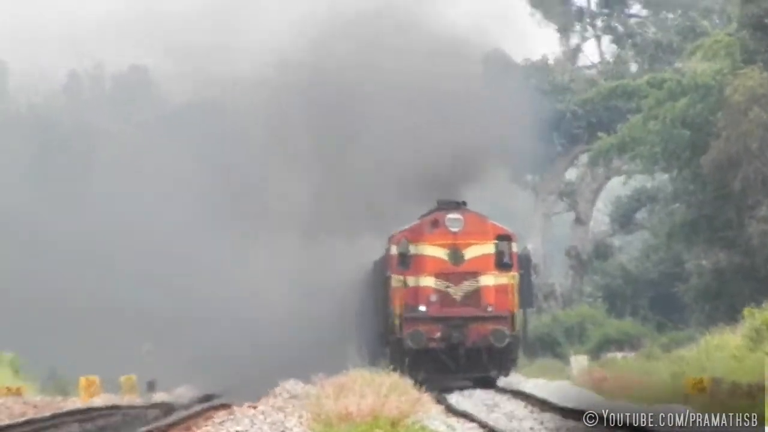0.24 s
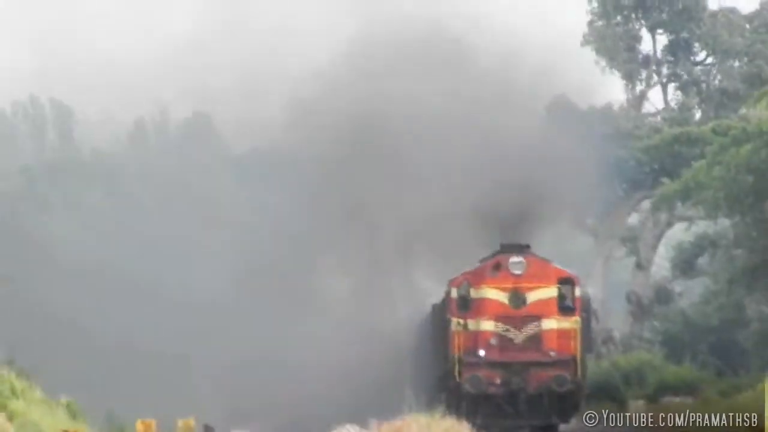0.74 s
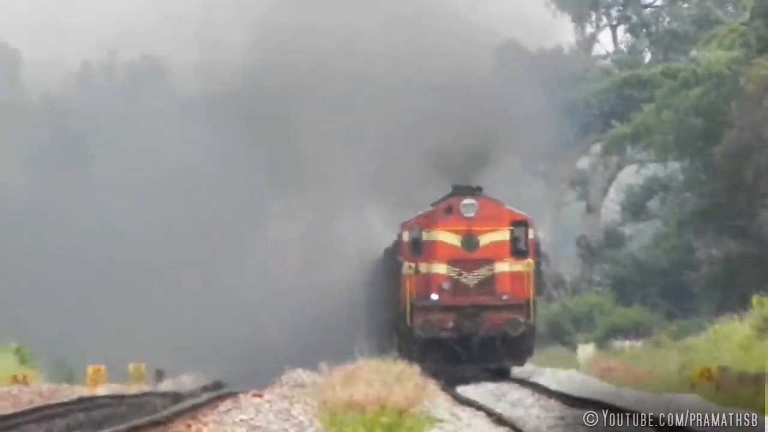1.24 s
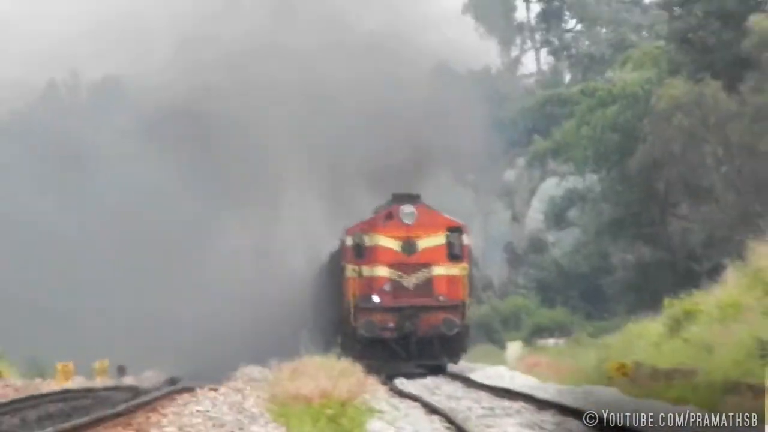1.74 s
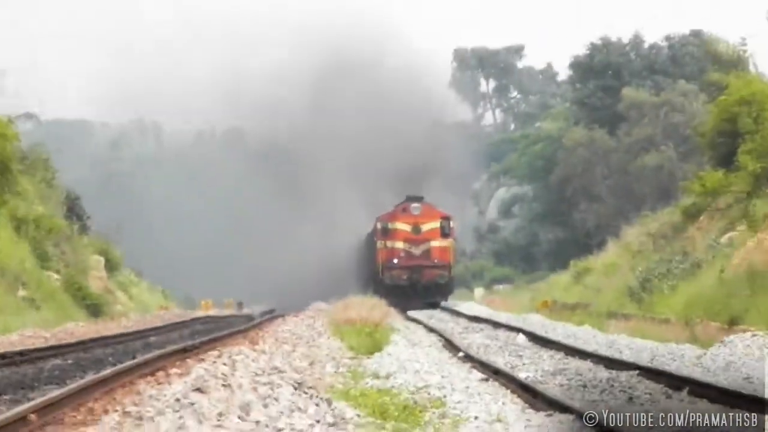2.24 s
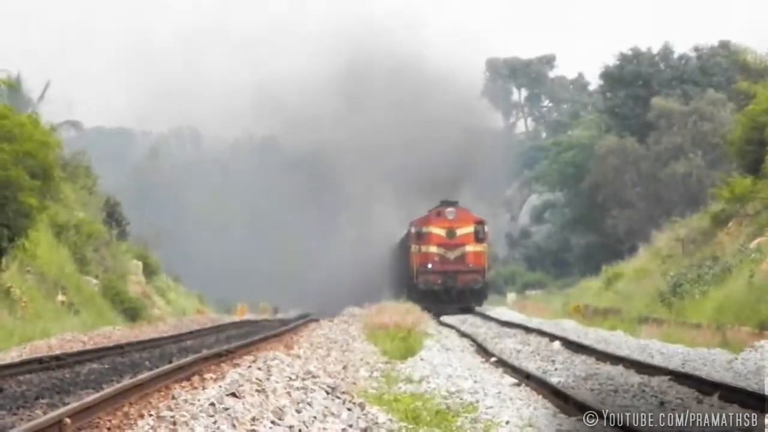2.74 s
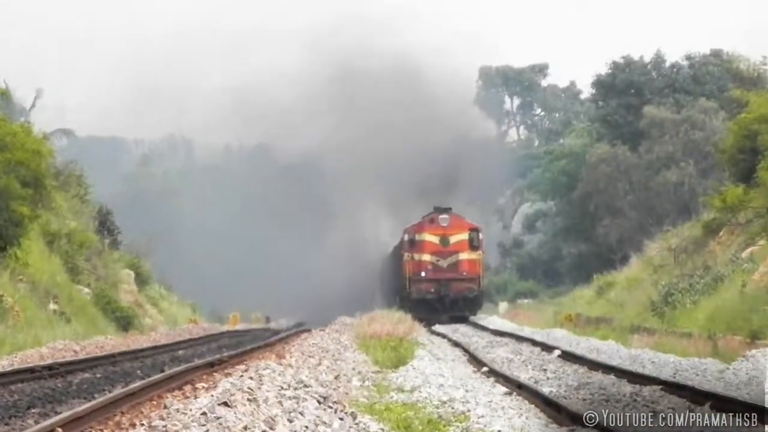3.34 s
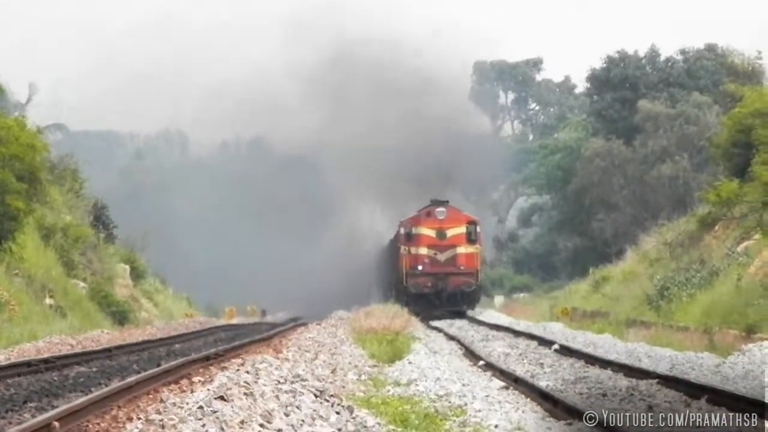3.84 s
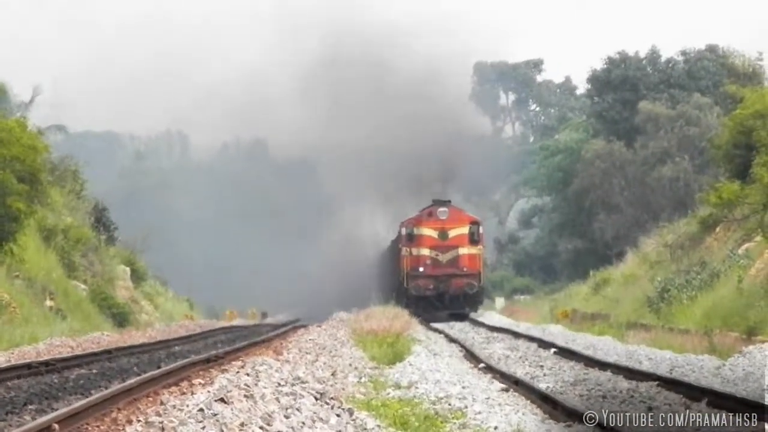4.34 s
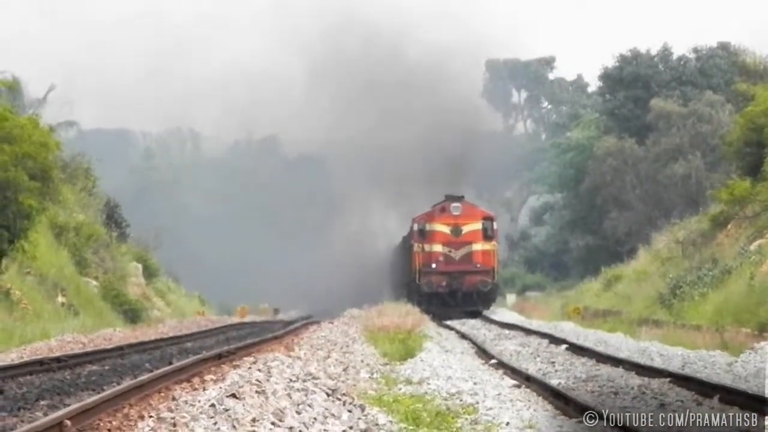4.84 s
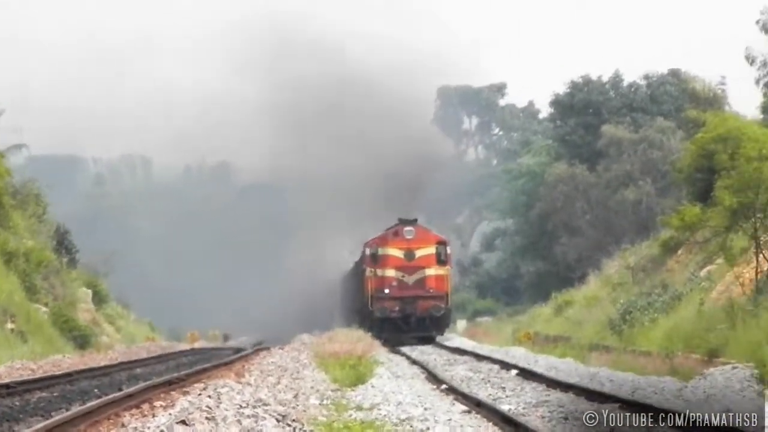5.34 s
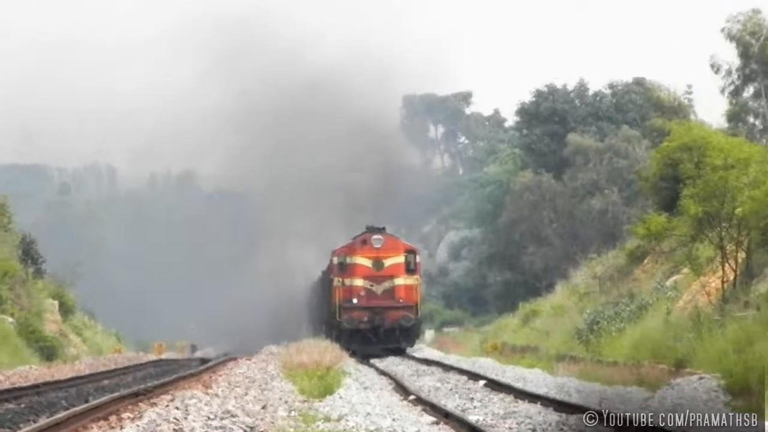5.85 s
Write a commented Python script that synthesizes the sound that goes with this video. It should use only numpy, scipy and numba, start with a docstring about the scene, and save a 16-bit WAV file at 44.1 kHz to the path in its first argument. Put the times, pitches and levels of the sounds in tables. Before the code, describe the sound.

Distant heavy diesel engines throb and chuff steadily under hard labor, while wind buffets the microphone and camera handling clicks, knocks and whirrs close by.

```python
"""Distant diesels past a hand-held camera

Two heavy diesel engines pull far off in a grassy cutting: summed orders of the engine cycle thump once
a cycle under a shaped-noise roar that chuffs in step. Noise gusts and single swings buffet the microphone
ports; the camera's plastic case rings to knocks, its focus motor thuds and whines in steps, and its zoom
motor whirrs, rasps and ticks."""
import sys
import numpy as np
from scipy import signal
from scipy.fft import rfft, irfft
from scipy.io import wavfile
from scipy.ndimage import uniform_filter1d
from numba import njit

SR = 44100
rng = np.random.default_rng(int(sys.argv[2]) if len(sys.argv) > 2 else 0)


def inscribe(sig):
    """Save sig as 16-bit PCM at rate SR to the path in sys.argv[1].

    A 1-D sig is mono; a 2-D sig holds one channel per row.
    Samples are clipped to [-1, 1] before scaling.
    """
    pcm = np.round(np.clip(np.atleast_2d(sig).T, -1, 1) * 32767)
    wavfile.write(sys.argv[1], SR, pcm.astype(np.int16))


N = 269010
T = np.arange(N) / SR

# Levels are relative settings; the functions add their own gains, and resonances a gain for their width.

# spectrum of the soft breeze: f/Hz, level/dB
BREEZE_SPECTRUM = [(12, -30), (28, -19), (40, -11), (60, -1), (100, -12.5), (140, -40), (300, -62),
                   (1500, -120)]
# strength of the breeze: t/s, level/dB
BREEZE_LEVEL = [(0, -40), (1.3, -35.5), (2, -42), (2.9, -44), (4.3, -51), (4.6, -41), (5.7, -41),
                (6.1, -58)]
# spectrum of the gusts: f/Hz, level/dB
GUST_SPECTRUM = [(15, -40), (28, -22), (40, -1.5), (70, 0.5), (120, 1.5), (170, -9), (250, -22.5),
                 (400, -64), (800, -85), (3000, -120)]
# gusts: peak t/s, peak level/dB, swell and fade time/s, left minus right level/dB
GUSTS = [(.52, -44.5, 0.019, 15), (.68, -35, 0.011, 2), (.8, -51, 0.018, -11), (1.288, -25, 0.034, -6.5),
         (1.44, -38, 0.097, -14), (1.69, -34.5, 0.021, -13), (1.77, -23, 0.032, -1.5),
         (1.827, -18.5, 0.008, 0), (1.952, -24, 0.014, 3), (2.03, -21.5, 0.026, 8), (2.141, -20, 0.05, 5),
         (2.228, -27, 0.02, -14), (2.33, -27.5, 0.021, 0), (2.44, -34.5, 0.04, -4), (2.56, -35, 0.048, 0),
         (3.99, -41, 0.042, -1), (4.64, -44.5, 0.081, -3), (5.76, -27, 0.043, 2), (5.81, -46, 0.016, -19),
         (5.931, -29, 0.015, 2), (6.07, -43, 0.042, -6)]
LULL_DB = -57  # gust level between the peaks
# single gust pops: t/s, f/Hz, left swing, right swing
GUST_POPS = [(0.668, 149, 0.13, -0.024), (0.879, 74, 0.0013, 0.1), (1.278, 138, -0.11, 0.15),
             (1.328, 96, -0.05, 0.28), (1.827, 133, 0.22, -0.94), (1.962, 87, 0.27, 0.24),
             (2.013, 91, 0.29, 0.026), (2.043, 99, 0.29, -0.37), (2.086, 133, -0.15, 0.51),
             (2.143, 119, -0.27, -0.1), (2.189, 138, 0.6, -0.14), (2.228, 124, 0.25, 0.1),
             (2.448, 98, -0.067, 0.32), (2.555, 93.5, -0.096, 0.27), (5.782, 91.5, 0.32, 0.049),
             (5.917, 150, -0.024, 0.016)]

# steps of the focus motor, in runs of about ten a second: t/s, thud level/dB, whine level/dB, whine length/s
FOCUS_STEPS = [(0.814, -33.5, -32.5, 0.017), (0.911, -34.5, -44, 0.039), (1.011, -38.5, -39, 0.024),
               (1.11, -33.5, -47.5, 0.038), (1.206, -33, -51, 0.027), (1.315, -32.5, -63, 0.023),
               (1.417, -37.5, -70, 0.027), (2.984, -37.5, -66, 0.024), (3.076, -38, -59.5, 0.038),
               (3.175, -40, -58, 0.023), (3.277, -44, -61, 0.03), (3.38, -40.5, -53, 0.03),
               (3.482, -37.5, -52, 0.027), (3.579, -35, -70, 0.03), (4.315, -45, -59, 0.036),
               (4.739, -39, -70, 0.03), (4.906, -50, -66, 0.022), (5, -43, -73, 0.027),
               (5.108, -35, -62, 0.028), (5.209, -35, -48, 0.028), (5.312, -36.5, -60, 0.022),
               (5.411, -35.5, -50, 0.024), (5.507, -33, -51, 0.03), (5.618, -35, -60, 0.022),
               (5.713, -33.5, -55, 0.02), (5.809, -35, -51, 0.025), (5.91, -51, -64, 0.026),
               (6.006, -38, -56, 0.03)]
THUD_S = 0.017
# jerks of the zoom motor: t/s, whine level/dB, length/s
ZOOM_JERKS = [(1.856, -36, .007), (1.868, -35, 0.0084), (1.888, -33.5, 0.0061), (1.905, -43, 0.0054),
              (1.934, -37, 0.02), (1.958, -46, 0.0078), (1.975, -50, 0.027), (2.008, -48, 0.011),
              (2.046, -44, 0.014), (2.062, -40, 0.0088), (2.076, -40, .006), (2.094, -40, 0.02),
              (2.125, -41.5, 0.023), (2.182, -38, 0.01), (2.218, -48, 0.012), (2.264, -44, 0.0059),
              (2.305, -45, 0.041), (2.455, -49, 0.019)]
# whine resonances of the motors: f/Hz, width/Hz, level/dB
MOTOR_WHINE = [(3810, 480, 20), (4340, 73, 9), (1460, 540, 10), (2950, 130, 8.5)]
# resonances of the lens barrel: f/Hz, width/Hz, level/dB
LENS_BARREL = [(344, 154, 4), (620, 260, 0), (1100, 133, -11.5), (1466, 91, -6.5), (1990, 45, -14),
               (2890, 310, -17)]

# zoom whirr resonances in the mid channel: f/Hz, width/Hz, level/dB
WHIRR_MID = [(346, 150, 12.5), (1010, 510, 9.5), (2720, 890, 9.5), (3620, 500, 8.5), (5260, 1300, 5.5),
             (9000, 2000, -14)]
# zoom whirr resonances in the side channel: f/Hz, width/Hz, level/dB
WHIRR_SIDE = [(2660, 500, 3), (3780, 600, 0), (5200, 330, 1), (6170, 840, -5)]
# resonances of the lens gear: f/Hz, width/Hz, level/dB
GEAR_RING = [(4970, 2000, 16.5), (8550, 1800, 8.5), (11400, 1100, 2), (13500, 2400, -2)]
# ticks of the lens gear, with a run as the zoom slows to its stop: t/s, peak level/dB
GEAR_TICKS = [(1.7908, -43), (1.8316, -33), (2.242, -46), (2.2617, -36), (2.277, -38), (2.291, -33),
              (2.31, -41), (2.329, -32), (2.35, -33), (2.369, -28), (2.39, -31), (2.409, -32),
              (2.4295, -43), (2.6462, -36), (2.6605, -31), (3.442, -40), (4.7794, -45), (4.8027, -40)]
ZOOM_ON_S, ZOOM_OFF_S, ZOOM_RISE_S, ZOOM_FALL_S, WHIRR_DB, RASP_DB = 1.82, 2.51, 0.052, 0.063, -57.5, -63
SLOWING_ON_S, SLOWING_OFF_S, SLOWING_RASP_DB = 2.25, 2.445, -53
CRACKLE_PER_S, CRACKLE_DB, CRACKLE_SPREAD_DB = 1500, 5.5, 2.5

# modes of the plastic case, low to high: f/Hz, width/Hz, level/dB
CASE_MODES = [(363.5, 58, 1), (518, 91, -2), (661, 86, -7.5), (812, 70, -3), (959, 72, -4.5),
              (1243, 150, -4), (1380, 100, -8.5), (1520, 125, -6.5), (1845, 250, -5), (2030, 160, -2),
              (2340, 220, -2.5), (2710, 320, -3), (3294, 340, -10)]
# resonances of the button rattle: f/Hz, width/Hz, level/dB
BUTTON_RATTLE = [(3921, 740, 3.5), (4531, 860, -2), (6331, 980, -7.5), (9201, 1500, -13),
                 (12901, 3300, -18)]
# knocks: t/s, low ring level/dB; middle, upper and hard ring level above the low one/dB;
# rattle level/dB, side minus mid level/dB, fall/s (bursts never fall quicker than 1 ms)
CASE_KNOCKS = [(0.7804, -23.5, -3, -16, -8.5, -42, 2, 0.0045),
               (1.1898, -22.5, 0.5, -8, -13.5, -41.5, 0, 0.0078),
               (1.4665, -21, 2, -2.5, -9.5, -37, 5, 0.0052), (1.473, -26, -2, -3, -27, -42, -7, 0.0042),
               (1.682, -32, 1, 2, -4, -46, -7, 0.0041), (1.755, -36.5, 1, -2, 3, -41, -4, 0.0091),
               (1.764, -38, -1, 12, -2, -33, -9, 0.0051), (1.768, -31.5, -8, -5, 3.5, -42, 1, 0.0027),
               (1.772, -36, 5, 3, -10, -38, 10, 0.0023), (1.782, -35, -2, -1, -1, -45, 0, 0.0059),
               (1.791, -23.5, 1.5, 8.5, -22, -31, -6, 0.0043),
               (1.832, -25, 1.5, -1, -8.5, -39, 6.5, 0.0056), (1.955, -30.5, 1.5, 1, -21, -34, 3, 0.0039),
               (2.1471, -32, 1, 2, 4, -28, 9.5, 0.0027), (2.152, -34, 8, -3, 3, -24, -9, 0.0018),
               (2.157, -43, -4, 6, 3, -33, 1, 0.0022), (2.162, -35.5, 14, 0, 4, -31, 2, 0.002),
               (2.165, -38.5, 3, 8, 6, -28, 5, .001), (2.1713, -33, 7, 2, -2, -22.5, 7, 0.00086),
               (2.59, -41, -8, -13, -22, -67, -4, 0.0034), (2.627, -43.5, 16, 10, -15, -50, -8, 0.0046),
               (2.63, -42, 18.5, 15, -11, -51, -5, 0.0029), (2.6454, -37, 4, 15, 8, -42, -9, 0.0036),
               (2.661, -41, 2, 10, -2, -36, -6, 0.002), (2.666, -29.5, 2, -3, -21, -41, -15, 0.0017),
               (2.67, -35, -7, 3, -9, -43.5, 2, 0.0063), (2.687, -30, -10, -3, -13, -47, -8, 0.0023),
               (2.694, -32.5, -14, -9, -27, -62, -6, 0.0018), (2.7, -31, -19, -28, -35, -68, -11, .002),
               (2.823, -40, -10, -14, -15, -63, -5, 0.003), (3.953, -37, -20, -17, -14, -65, -5, .004)]
SCUFF_DB = -3.5

# speed of the leading engine: t/s, four-stroke cycle rate f/Hz
LEAD_SPEED = [(0, 8.10), (1.2, 8.23), (6.1, 8.23)]
# start points in cycles, rear cycle rate in Hz, shared phase of the orders in turns
LEAD_START, REAR_HZ, REAR_START, ORDER_PHASE = .03, 8.29, -.07, .1
# orders of the leading engine: multiple of the cycle rate, level/dB
LEAD_ORDERS = [(4, -58), (5, -38.5), (6, -40), (7, -33), (8, -42.5), (9, -36), (10, -42.5), (11, -40),
               (12, -43.5), (13, -56.5), (14, -50), (15, -56), (18, -66), (21, -66), (22, -70), (23, -60.5),
               (25, -62), (26, -71.5)]
# orders of the rear engine: multiple of the cycle rate, level/dB
REAR_ORDERS = [(7, -40), (8, -57), (9, -46), (11, -48), (12, -52.5)]
# exhaust thump: t/s, gain level/dB
THUMP_GAIN = [(0, -5), (.7, -3), (1.4, -1.5), (2.1, -0.5), (2.8, 1.5), (3.4, -1), (4, 0), (4.7, -2),
              (5.4, 1.5), (6.1, -2.5)]
# roar: t/s, chest level/dB, bark level/dB, gas and air level/dB, level off the slopes/dB
ROAR_LEVELS = [(0, -49.5, -53, -53.5, -40), (1.1, -55, -53.5, -54.5, -39), (1.7, -55, -53, -54, -39.5),
               (1.95, -39, -52, -54, -38), (2.3, -50, -50.5, -56, -41.5),
               (2.75, -49.5, -48.5, -61.5, -45.5), (3.18, -49, -57.5, -60.5, -42.5),
               (3.4, -49.5, -55.5, -55, -41), (3.7, -51.5, -54, -54, -39.5), (4.2, -51.5, -52, -53, -39.5),
               (5.27, -47, -50, -52, -39.5), (6.1, -48, -47.5, -52, -39)]
RUMBLE_DB = -40
# spectrum of the roar ahead: f/Hz, level/dB
AHEAD_SPECTRUM = [(20, -43), (36, -14), (60, 0), (110, -10.5), (145, -20.5), (190, -18), (270, -25),
                  (370, -23), (870, -24), (3000, -34.5), (6000, -46), (15500, -64)]
# resonances that colour the roar: f/Hz, width/Hz, level/dB
STACK_RESONANCES = [(654, 102, -4.5), (1076, 330, -10), (1633, 340, -8), (2176, 390, -4.5),
                    (2590, 450, -13.5), (3835, 140, -16)]
# dips in the roar: f/Hz, width/Hz, depth 0-1
ROAR_DIPS = [(437, 97, 0.21), (847, 210, 0.45), (1390, 130, 0.26)]
# spectrum of the roar off the slopes: f/Hz, level/dB
SLOPE_SPECTRUM = [(12, -21), (20, 0), (80, -19), (126, -64), (157, -66), (232, -18), (315, -4.5),
                  (342, -0.5), (416, 3), (565, -2.5), (614, -3), (686, -4.5), (811, -5.5), (1410, -10),
                  (15500, -46.5)]
# the exhaust chuffs once a cycle; times in cycles
CHUFF_START, CHUFF_RISE, CHUFF_FALL, CHUFF_SCATTER, BARK_START, BARK_FALL = .45, 0.028, 0.45, 0.15, 1, 0.052
# notches from a hand near the ports: f/Hz, width/Hz
HAND_NOTCHES = [(450, 220), (1800, 670)]
HOLLOW_ON_S, HOLLOW_OFF_S, HOLLOW_FADE_S, HOLLOW_SHARE = 1.79, 3.56, 0.3, 0.74
# glide of those notches: t/s, factor on f
HAND_GLIDE = [(0, .8), (2.2, 0.71), (2.55, 1.04), (2.85, 1.01), (3.05, 1), (3.3, 0.87), (6.1, .75)]

# spectrum of the microphone hiss: f/Hz, level/dB
HISS_SPECTRUM = [(1500, 7), (5000, 1), (9000, 4), (12000, -7), (16000, 3)]
HISS_DB, TOP_HZ = -66, 15750


def undb(db):
    """Turns dB into an amplitude factor."""
    return 10 ** (np.asarray(db) / 20)


def unit(x):
    """Scales to an RMS of 1."""
    return x / np.sqrt(np.mean(x ** 2))


def curves(table):
    """Joins the columns of a table by straight lines in time."""
    s, *columns = np.transpose(table)
    return [np.interp(T, s, c) for c in columns]


def colour(x, points):
    """Filters by (f/Hz, level/dB) points joined on a log frequency axis."""
    hz, db = np.transpose(points)
    f = np.maximum(np.arange(N // 2 + 1) * SR / N, 1)
    gain = undb(np.interp(np.log(f), np.log(hz), db))
    return irfft(rfft(x) * gain, N)


def band(x, lo_hz, hi_hz):
    """Butterworth band-pass."""
    return signal.sosfilt(signal.butter(2, [lo_hz, hi_hz], "bandpass", fs=SR, output="sos"), x)


def resonate(x, peaks):
    """Sums steep-skirted resonances, narrow ones lifted to offset their lost noise power."""
    return sum(undb(db) * np.sqrt(300 / width) * band(x, hz - width / 2, hz + width / 2)
               for hz, width, db in peaks)


def ring(x, modes):
    """Sums modes that start at once and die away, the narrower the longer."""
    out = 0
    for hz, width, db in modes:
        mode = signal.iirpeak(hz, hz / width, fs=SR)
        out = out + undb(db) * np.sqrt(300 / width) * signal.lfilter(*mode, band(x, hz / 1.37, hz * 1.36))
    return out


@njit
def glide(x, hz, width):
    """Band-pass whose centre moves; gain 1 at the centre."""
    y, b, l = np.empty(len(x)), 0., 0.  # b and l: band-pass and low-pass states
    for i in range(len(x)):
        g, k = np.tan(np.pi * hz[i] / SR), width / hz[i]
        v = (b + g * (x[i] - l)) / (1 + g * (g + k))
        b, l, y[i] = 2 * v - b, l + 2 * g * v, k * v
    return y


def walk(rate):
    """Random levels held for 1 / rate s and slewed twice; spread near 1."""
    k = int(SR / rate)
    held = np.repeat(rng.standard_normal(N // k + 1), k)
    return 2.0 * uniform_filter1d(uniform_filter1d(held, k), k)[:N]


def noise():
    """Two independent channels of white noise."""
    return rng.standard_normal((2, N))


def bursts(rows, rise_s, squareness):
    """Envelope of (t/s, level/dB, length/s) rows: quick rise, then a fall, later and steeper if squarer."""
    out, t = np.zeros(N + SR // 4), T[:SR // 4]
    for s, db, length in rows:
        fall = np.exp(-(t / max(length, .001)) ** squareness)
        out[int(s * SR):][:len(t)] += undb(db) * (1 - np.exp(-t / rise_s)) * fall
    return out[:N]


def taps(s, db):
    """One sharp push, a single sample long, at each time."""
    out = np.zeros(N)
    out[(s * SR).astype(int)] = undb(db)
    return out


def hold(on, off, rise_s, fall_s):
    """Envelope that rises from on and is back at zero by off."""
    return np.clip(np.minimum((T - on) / rise_s, (off - T) / fall_s), 0, 1)


def stereo(mid, side):
    """Left and right from mid and side."""
    return np.array([mid + side, mid - side])


def wind():
    """Eddies on each port: a soft breeze, lumpy gusts and single pops of about one swing."""
    breeze = np.array([unit(colour(port * undb(6.8 * walk(15)), BREEZE_SPECTRUM)) for port in noise()])
    breeze = breeze * undb(curves(BREEZE_LEVEL)[0])

    force = undb(LULL_DB)
    for s, db, length, pan_db in GUSTS:
        port_db = db + np.array([[pan_db], [-pan_db]]) / 2
        force = force + np.exp(-np.abs((T - s) / length) ** 1.1) * undb(port_db)
    gusts = np.array([colour(port * undb(1.9 * walk(45)), GUST_SPECTRUM) for port in noise()])
    gusts = gusts / np.std(band(gusts, 121.0, 340)) * force

    pops = 0
    for s, hz, left, right in GUST_POPS:
        turns = (T - s) * hz
        swing = np.exp(-(turns / 0.53) ** 2) * np.sin(2 * np.pi * turns)
        pops = pops + swing * np.array([[left], [right]])
    return breeze + gusts + pops


def focus():
    """Each step of the focus motor thuds in the lens barrel; steps and zoom jerks whine briefly."""
    s, thud_db, whine_db, length = np.transpose(FOCUS_STEPS)
    drive = bursts(zip(s, whine_db, length), 0.011, 1.84) + bursts(ZOOM_JERKS, 0.0024, 1.5)
    whine = unit(resonate(noise() * undb(1.1 * walk(270)), MOTOR_WHINE))
    mid, side = whine * drive * undb([[1.5], [-6]])
    scrape = undb(-4) * noise()[0] * bursts(zip(s, thud_db, THUD_S + 0 * s), 0.004, 1.43)
    push = scrape + taps(s + 0.00104, thud_db + 17.0)
    return stereo(mid + undb(15.5) * resonate(push, LENS_BARREL), side)


def zoom():
    """A gritty motor whirr, and gear teeth that tick over a bright rasp."""
    running = hold(ZOOM_ON_S, ZOOM_OFF_S, ZOOM_RISE_S, ZOOM_FALL_S)
    # sparse random spikes on a steady floor make the grit
    when, size = rng.random((2, N))
    spikes = (when < CRACKLE_PER_S / SR) * undb(CRACKLE_DB - CRACKLE_SPREAD_DB * np.log(1 - size))
    crackle = unit((1 + spikes) * undb(1.4 * walk(250)))
    grit = noise() * crackle

    whirr = np.array([resonate(grit[0], WHIRR_MID), resonate(grit[1], WHIRR_SIDE)])
    whirr = whirr / np.std(band(whirr, 5300, 6300), axis=1, keepdims=True)
    whirr = whirr * undb(WHIRR_DB + np.array([[-1.5], [1.5]])) * running

    s, db = np.transpose(GEAR_TICKS)
    slowing = hold(SLOWING_ON_S, SLOWING_OFF_S, 0.03, 0.033)
    rasp = undb(RASP_DB) * running + undb(SLOWING_RASP_DB) * slowing
    teeth = noise() * (bursts(zip(s, db, 0.001 + 0 * s), 0.0002, 0.85) + rasp * crackle)
    # the lower ring of the gear reaches the two ports in opposition
    mid = undb(4.5) * resonate(teeth[0], GEAR_RING[1:])
    side = undb(3.0) * resonate(teeth[1], GEAR_RING[:2])
    return stereo(*(whirr + np.array([mid, side])))


def knocks():
    """Fingers tap the case: soft taps ring its low modes, hard ones the upper modes; buttons rattle."""
    s, low_db, middle_db, upper_db, hard_db, rattle_db, side_db, fall = np.transpose(CASE_KNOCKS)
    out = []
    for push, wide_db in zip(noise() * undb(1.7 * walk(600)), (0 * s, side_db)):
        def blows(db, tap_db, scuff_db=SCUFF_DB):
            """A noisy scuff with a sharp tap at its start."""
            scuff = push * bursts(zip(s, db + wide_db + scuff_db, fall), 0.00017, 0.55)
            return scuff - taps(s, db + wide_db + tap_db)
        low = ring(blows(low_db, tap_db=21.5), CASE_MODES[:3])
        middle = ring(blows(low_db + middle_db, tap_db=18.5), CASE_MODES[3:5])
        upper = ring(blows(low_db + upper_db, tap_db=19.0), CASE_MODES[5:8])
        hard = ring(blows(low_db + hard_db, tap_db=15.5), CASE_MODES[8:])
        rattle = resonate(blows(rattle_db, tap_db=7.0, scuff_db=-0.3), BUTTON_RATTLE)
        out.append(undb(12.0) * (low + middle + upper) + undb(17) * hard + undb(11.0) * rattle)
    return stereo(out[0], -out[1])


def thump(lead):
    """Uneven cylinders line the low orders of both engines up into one thump a cycle."""
    out = 0
    for turns, orders in ((lead, LEAD_ORDERS), (REAR_START + REAR_HZ * T, REAR_ORDERS)):
        for k, db in orders:
            # moving air makes each order waver a little in level and phase
            level = undb(db + 2.2 * walk(2.45))
            phase = 2 * np.pi * (k * turns + ORDER_PHASE) + 0.61 * walk(2.187)
            out = out + level * np.cos(phase)
    return np.sqrt(2) * out * undb(curves(THUMP_GAIN)[0])


def chuff(turns, fall):
    """Quick rise and slower fall once a cycle, each cycle of its own strength; mean 0, spread 1."""
    p = turns % 1
    size = np.exp(CHUFF_SCATTER * rng.standard_normal(64))[turns.astype(int)]
    shape = size * (1 - np.exp(-p / CHUFF_RISE)) * np.exp(-p / fall) * (1 - p ** 8)
    return unit(shape - shape.mean())


def hollow(x):
    """A hand near the ports hollows the roar for a while: gliding notches fade in and out."""
    share = HOLLOW_SHARE * hold(HOLLOW_ON_S, HOLLOW_OFF_S, HOLLOW_FADE_S, HOLLOW_FADE_S)
    for hz, width in HAND_NOTCHES:
        x = x - share * glide(x, hz * curves(HAND_GLIDE)[0], 1. * width)
    return x


def engines():
    """Thumps over a rumble, and a gassy exhaust roar that swells and chuffs once a cycle."""
    lead = LEAD_START + np.cumsum(curves(LEAD_SPEED)[0]) / SR
    beat = thump(lead)
    chest_db, bark_db, gas_db, slopes_db = curves(ROAR_LEVELS)
    exhaust, wide = noise()
    exhaust = colour(exhaust, AHEAD_SPECTRUM) + undb(-28.5) * resonate(exhaust, STACK_RESONANCES)
    for hz, width, depth in ROAR_DIPS:
        exhaust = exhaust - depth * glide(exhaust, hz + 0 * T, 1. * width)

    # differences between ever wider low-passes split the roar into five bands
    under = [colour(exhaust, [(hz, 0), (1.6 * hz, -40)]) for hz in (190, 480, 1450, 4600)]
    rumble, chest, bark, gas, air = np.diff([0 * T, *under, exhaust], axis=0)
    swell = chuff(lead + 1 - CHUFF_START, CHUFF_FALL)
    knock = chuff(lead + 1 - BARK_START, BARK_FALL)

    rumble = unit(rumble) * undb(RUMBLE_DB + 1.8 * walk(3.19))
    chest = chest / np.std(band(chest, 170, 780))
    chest = chest * undb(chest_db + 1.1 * swell + 0.94 * knock + 0.84 * walk(26))
    bark = unit(bark) * undb(bark_db + 1.8 * swell + 0.41 * knock + 1.55 * walk(17))
    treble = (gas * undb(0.97 * walk(18)) + air * undb(-0.8)) / np.std(band(gas, 1370, 3700))
    treble = treble * undb(gas_db + 1.66 * swell)
    roar = rumble + chest + bark + treble

    # sound off the slopes reaches the close ports unalike and the camera widens it
    slopes = unit(colour(wide * undb(0.47 * walk(30) + 0.29 * swell), SLOPE_SPECTRUM)) * undb(slopes_db)
    late_beat = undb(-22) * np.roll(beat, 150)  # in samples
    return stereo(beat + hollow(roar), slopes + late_beat)


def scene():
    """Sums the layers from the wind to the engines."""
    return wind() + focus() + zoom() + knocks() + engines()


def record(dry):
    """The microphones hiss faintly; the camera rounds the gust peaks and cuts the top steeply."""
    mid, side = (unit(colour(n, HISS_SPECTRUM)) * undb(HISS_DB) for n in noise())
    rounded = np.tanh(1.213 * (dry + stereo(mid, .25 * side))) / 1.41
    return signal.sosfilt(signal.ellip(10, .2, 80, TOP_HZ, fs=SR, output="sos"), rounded)


dry = scene()
out = record(dry)
inscribe(out)
```